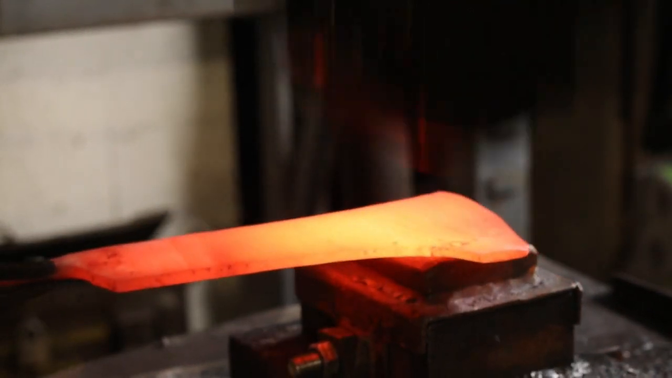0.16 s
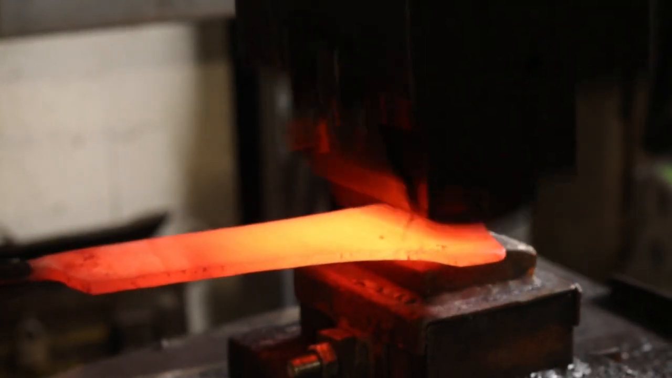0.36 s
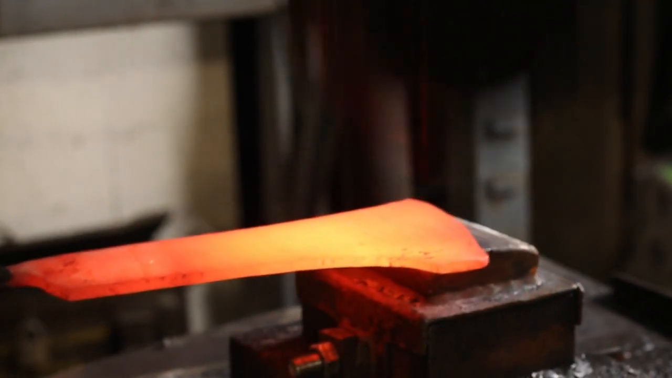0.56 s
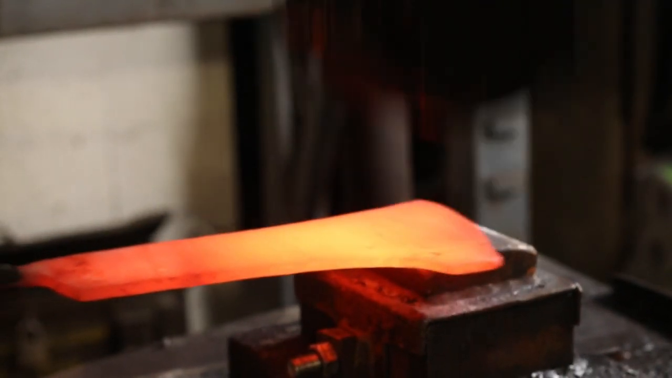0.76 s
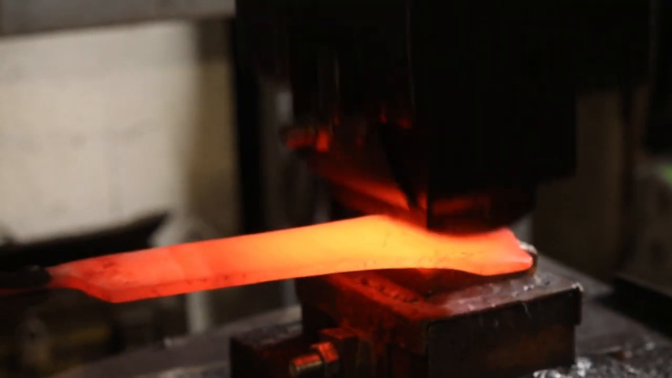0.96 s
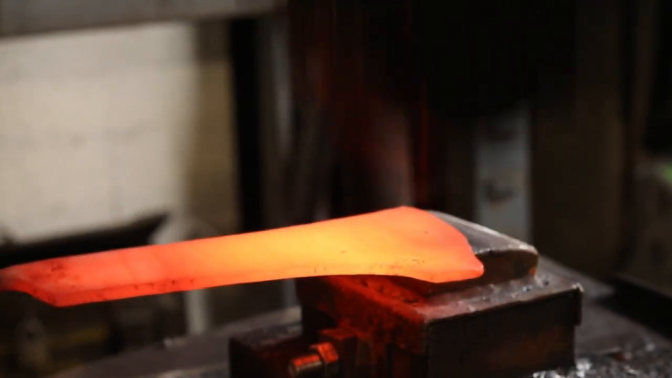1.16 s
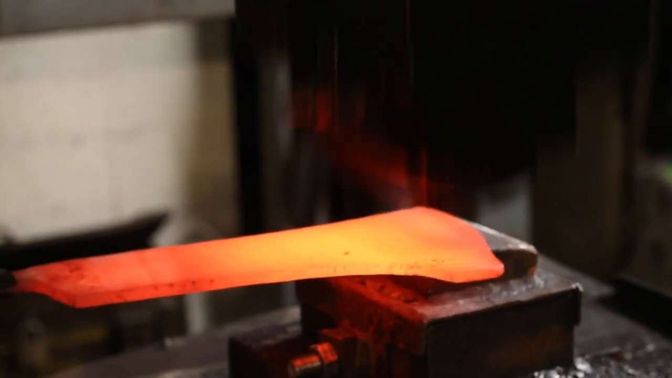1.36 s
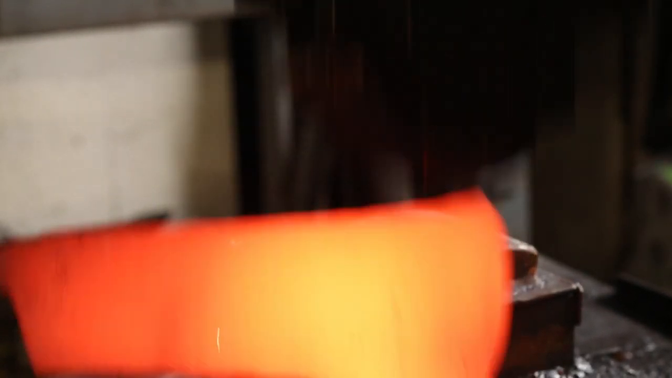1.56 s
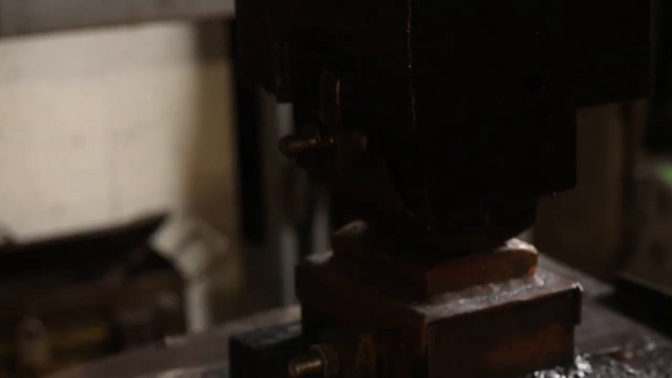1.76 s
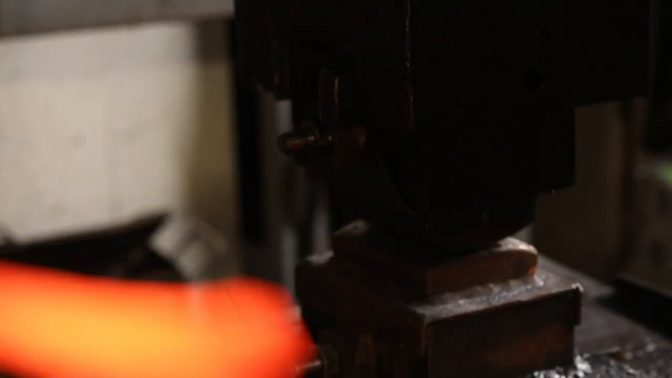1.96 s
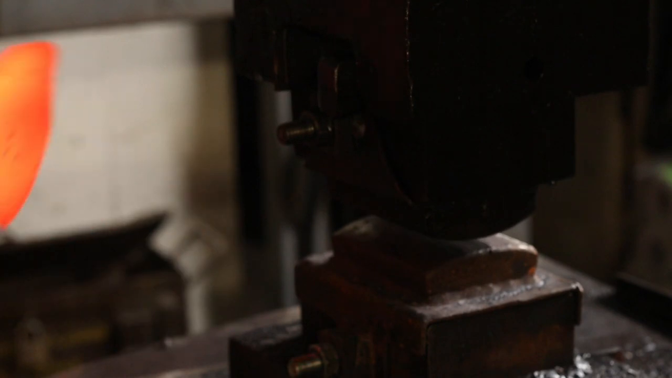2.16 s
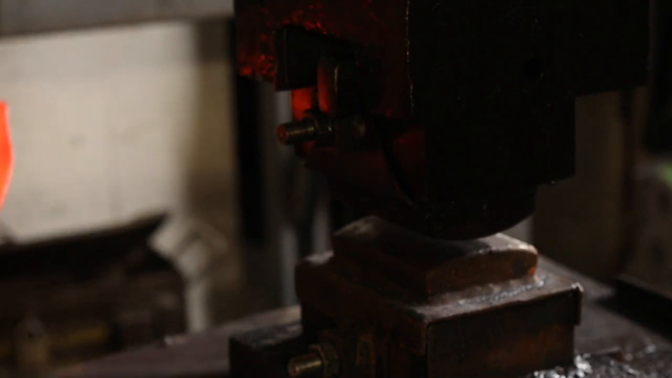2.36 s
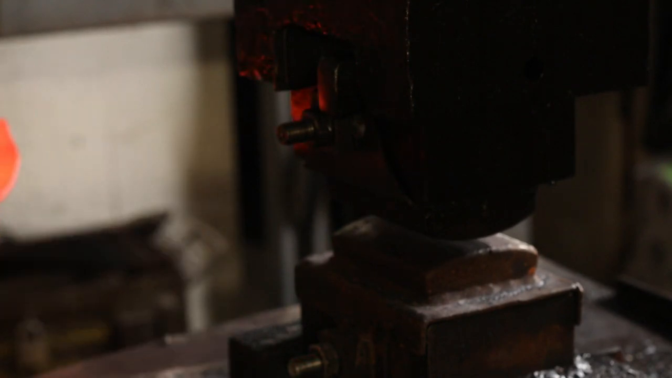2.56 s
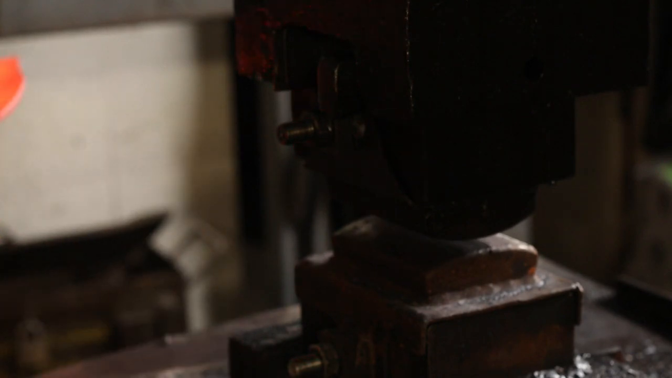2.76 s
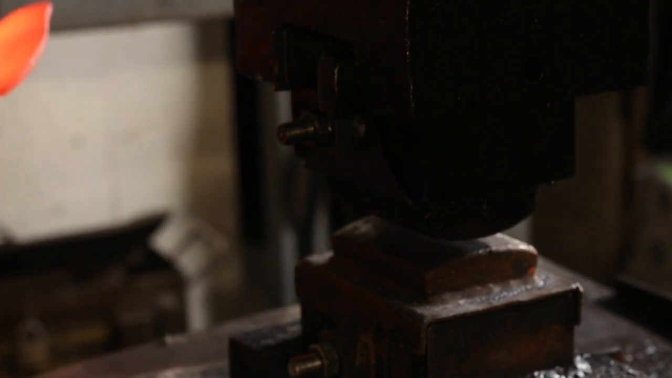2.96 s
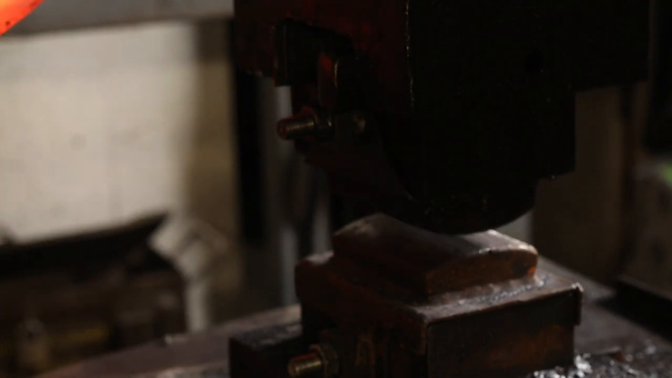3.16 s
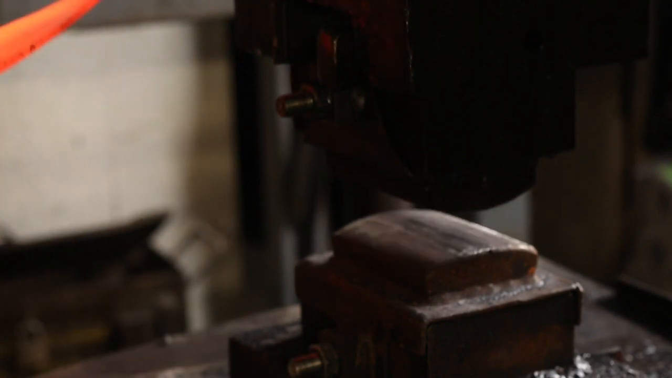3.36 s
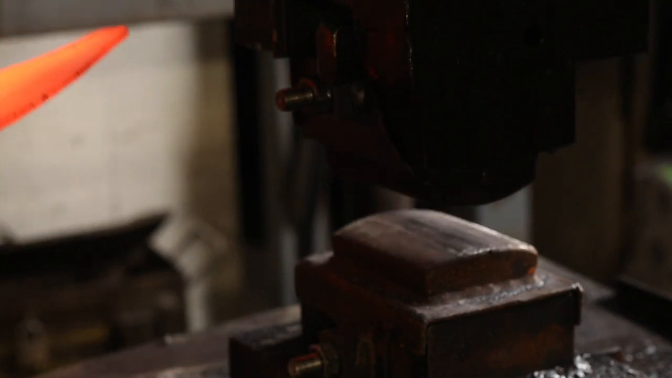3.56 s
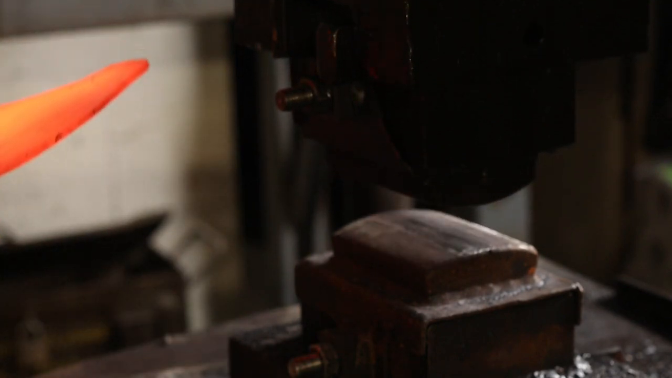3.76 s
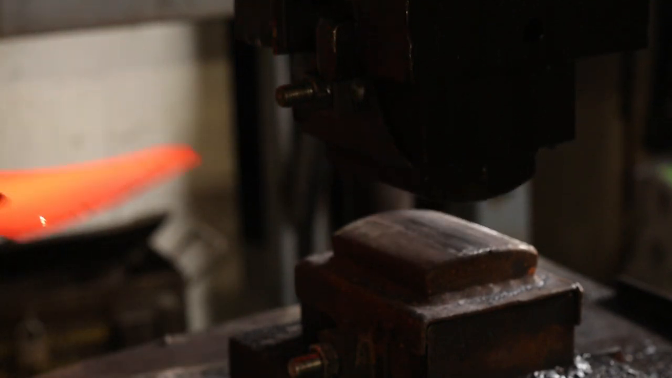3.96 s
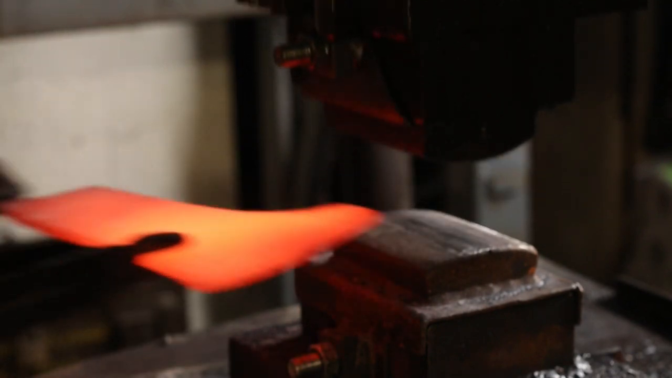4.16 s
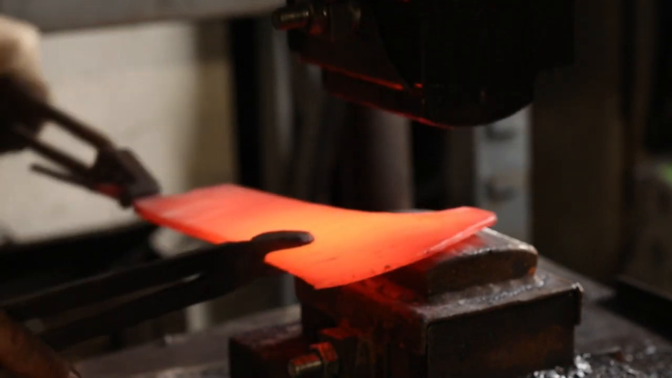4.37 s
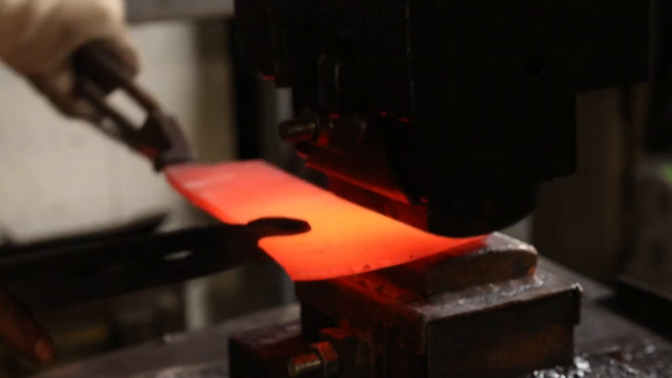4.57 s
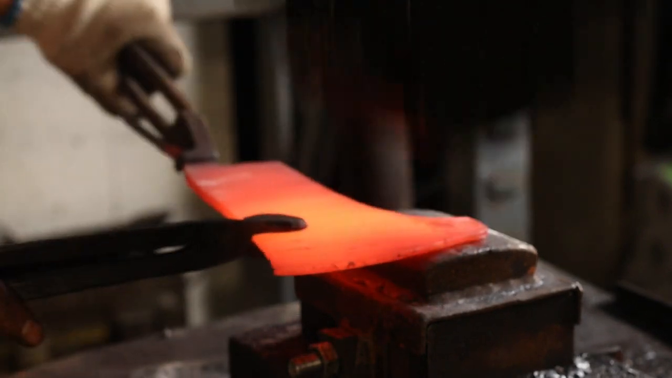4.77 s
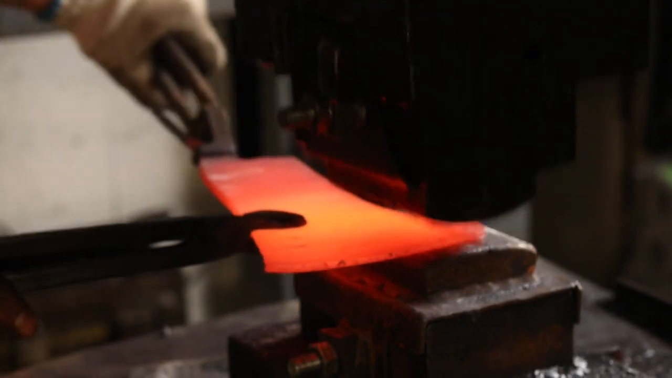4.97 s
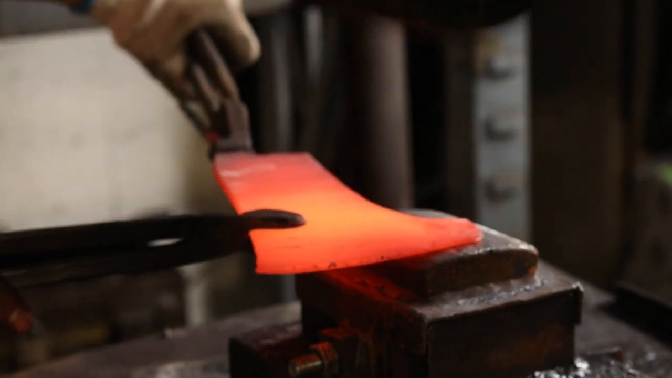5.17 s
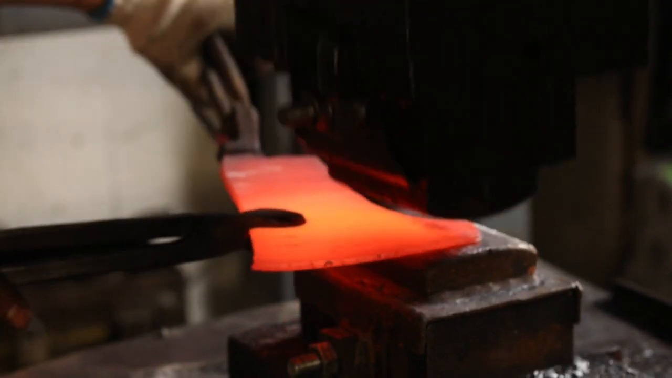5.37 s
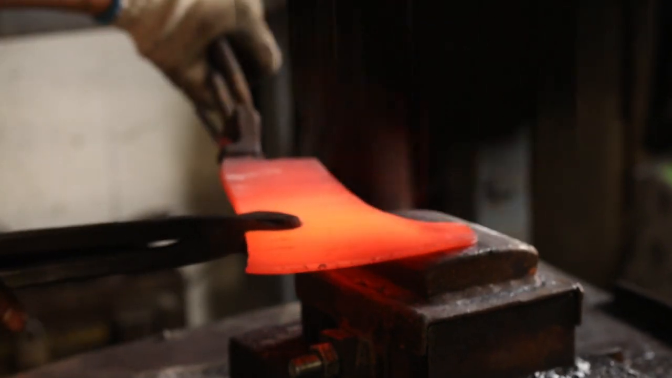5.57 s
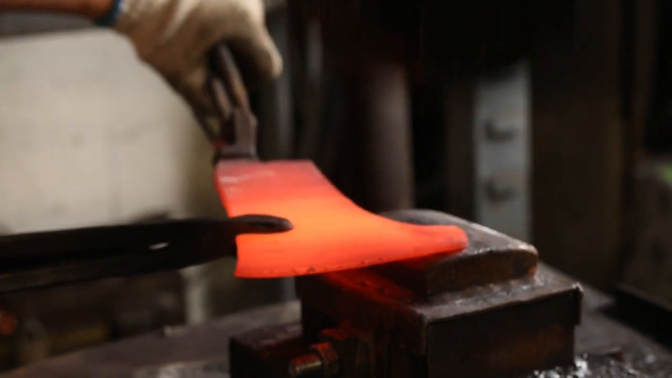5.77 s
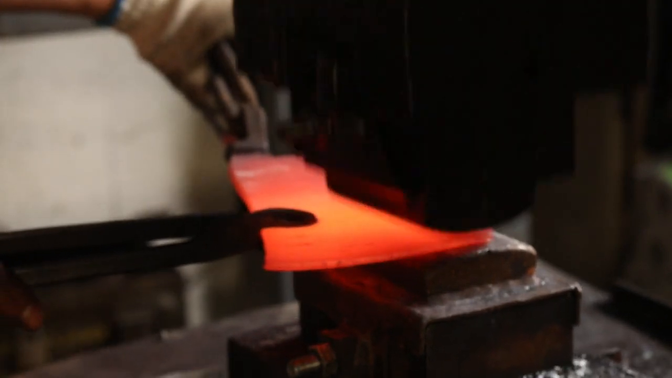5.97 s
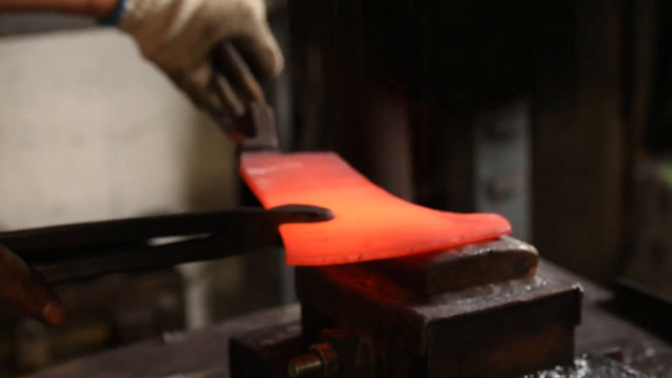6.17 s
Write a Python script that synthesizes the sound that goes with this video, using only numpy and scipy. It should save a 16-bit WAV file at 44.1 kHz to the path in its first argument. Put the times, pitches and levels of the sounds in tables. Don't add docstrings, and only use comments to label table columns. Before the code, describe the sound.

In a workshop, a mechanical power hammer strikes hot steel about every 0.3 seconds: five dull, heavy thuds, each with a rebound and a bright linkage clack, then a weak last blow. The drive rattles and drops away to a quiet, slowly rising motor hum with faint ticks and chinks of tongs. Five louder, crisper blows follow, ringing anvil and frame. Close stereo microphone, short metallic room tail.

```python
import sys
import numpy as np
from scipy import signal
from scipy.io import wavfile
from scipy.ndimage import uniform_filter1d

SR = 44100
rng = np.random.default_rng(int(sys.argv[2]) if len(sys.argv) > 2 else 0)


def unload_wav(signal):
    wavfile.write(
        sys.argv[1],
        SR,
        np.round(np.clip(np.atleast_2d(signal).T, -1, 1) * 32767).astype(np.int16),
    )


def amplitude_ratio(level_db):
    exponent = np.asarray(level_db, float) / 20
    return 10 ** exponent


N = 273861
T = np.arange(N) / SR
SECOND_RUN = (T > 3).astype(int)

# start_s, peak_db, crack_rel_db
STROKES = [
    [(0.1161, -2, -18.5), (0.406, -3, -12), (0.6988, -3.5, -18), (0.9966, -4, -10.5), (1.296, -6, -13),
     (1.7205, -14.5, -16)],
    [(4.6518, 1, -14.5), (5.037, -0.5, -0.5), (5.3672, 0.5, -1.5), (5.6935, 0, -5), (5.9913, 0, -12.5)],
]
# start_s, peak_db, crack_rel_db
REBOUNDS = [
    [(0.187, -14, -25.5), (0.478, -12.5, -19), (0.767, -13, -11), (1.072, -12, -10.5),
     (1.3603, -13.5, -7.5), (1.7903, -14.5, -11)],
    [(4.740, -8, -27), (5.1028, -9.5, 0), (5.441, -11, 3.5), (5.7594, -7.5, -9.5), (6.0676, -8, -8)],
]
# start_s, peak_db
KNOCKS = [
    [(1.423, -21), (1.761, -45), (1.826, -21)],
    [(4.539, -27), (4.681, -16), (4.794, -7), (4.822, -31), (5.158, -2.5), (5.518, -8)],
]
# shudder_s, shudder_lag_s, hall_db, anvil_force_rel_db
STANCE = [
    (0.048, -0.00032, -9.5, -20),
    (.034, -.001, -4.5, -17.5),
]
# thud_below_400hz_rel_db, sizzle_above_4khz_rel_db, shudder_share, hall_rel_db, softness
KINDS = [
    (-4, -8.5, 0.94, -1, 1.2),
    (-15, -8, 0.93, 0.5, 3.9),
    (-15, -14.5, 0.56, 1.5, 3),
]
REBOUND_FORCE_DB = [-13.5, -12]
CRACK_S = [0.0035, 0.0024]
DULLING_DB_PER_DB = 0.15
# pitch_hz, level_db, t60_s
FRAME_MODES = [(121, -8, .2), (177, 1, .22), (209, 0, .22), (235, -4, .15), (293, 0, .22), (380, -9, .12),
               (445, -3, .25), (512, -6, .16), (620, -10, .08), (767, -11, .1), (830, -11, .1),
               (1040, -12, .06), (1260, -14, .05)]
# freq_hz, level_db
BLOW_COLOUR = [(24, -46.5), (40, -47.5), (417, 3.5), (653, -5), (1220, -7), (1310, -9), (1640, -9),
               (2220, -12), (2710, -14.5), (3060, -17), (11500, -21.5), (13000, -19.5), (15500, -57)]

# start_s, peak_db, body_below_2khz_db, shudder_s
CLACKS = [(0.012, -10, -13.5, 0.016), (0.3022, -7.5, -19.5, 0.0093), (0.348, -27.5, -38, 0.0059),
          (0.596, -10.5, -33, 0.01), (0.6424, -35, -29, 0.01), (0.891, -9, -34, 0.011),
          (0.9437, -52, -32, 0.017), (1.186, -11, -46, 0.011), (1.2401, -31, -28, 0.019),
          (1.54, -10.5, -49, 0.0071), (1.616, -25, -47, 0.02), (1.6528, -18, -15, 0.0052),
          (1.977, -28, -38, 0.008), (4.9003, 7.5, -1, 0.01), (4.977, -8.5, -12, 0.0069),
          (5.029, -1.5, -14, 0.007), (5.207, -9, -6.5, 0.011), (5.241, 6.5, 1.5, 0.013),
          (5.324, -5, -8, 0.0072), (5.363, -5, -15.5, 0.005), (5.582, 1.5, -3.5, 0.016),
          (5.669, -9, -20, 0.011), (5.8806, 1.5, 0, 0.0089), (5.9275, -11.5, -16.5, 0.0099),
          (6.1918, -3.5, -44.5, 0.017)]
# freq_hz, level_db
CLACK_COLOUR = [(180, -19), (300, -15), (1000, -6), (3000, -8.5), (6000, -10.5), (12000, -19), (13800, -36),
                (15500, -57)]
# pitch_hz, level_db, t60_s
LINK_MODES = [(3400, 0, .05), (4900, -2, .03), (6500, -3, .04)]
CLACK_TOP_DB = -30.5

# start_s, effort_db
DRIVE = [(0, -28), (1.3, -34.5), (1.7, -35), (1.93, -35), (2.12, -57.5), (4.62, -72.5), (4.8, -34),
         (5.15, -23), (5.55, -24.5), (5.7, -29), (6.21, -33)]
CLATTER_SHARE_DB = [-2.5, 3]
# freq_hz, level_db
CLATTER_COLOUR = [(24, -40), (40, -31.5), (166, -0.5), (438, -12.5), (686, -2.5), (1600, -13.5),
                  (2510, -18), (3470, -15), (11500, -32), (13700, -41), (15500, -81)]

# start_s, peak_db, shudder_s, pan_db
TICKS = [
    (3.0794, -51.5, 0.028, -6.5),
    (3.272, -49, 0.0099, -18),
    (3.287, -43.5, 0.017, 6),
    (3.6242, -49.5, 0.0074, 15.5),
    (3.922, -43, 0.006, 9),
    (3.9952, -31, 0.0059, 3),
    (4.0247, -34.5, 0.0093, 0),
    (4.069, -37.5, 0.018, -11),
    (4.0836, -44, 0.0079, 7.5),
    (4.352, -20, 0.0043, -0.5),
]
# start_s, peak_db
CHINKS = [
    (2.437, -58),
    (2.489, -52),
    (2.849, -37),
    (2.872, -37),
    (4.573, -37.5),
]
# pitch_hz, level_db, t60_s
TONG_MODES = [(3435, -24, 0.59), (4151, -78, 5.0), (4737, -31, 5.0), (6150, -2, 0.11), (6476, -14, 0.32),
              (7144, -17, 0.22), (7515, -45, 0.68), (8070, -0.5, 0.098), (8823, -14, 0.16),
              (9432, -38, 0.72), (9840, -1.5, 0.15), (10780, -24, 0.75), (11800, -11, 0.21),
              (15300, -6, 0.096)]
TICK_TOP_DB = -9

# freq_hz, level_db
IDLE_COLOUR = [(15, -32), (30, -35), (64, -19.5), (110, -28), (180, -21), (280, -11), (460, -20),
               (670, -28), (1200, -27), (2500, -34), (4500, -40.5), (8000, -48.5), (12500, -51.5),
               (15500, -100)]
# freq_hz, width_hz, level_db
GEARS = [(302.4, 57, -8.5), (358.8, 12, -9.5), (485.4, 81, -7.5), (836, 45, -16), (2083, 180, -12.5),
         (4090, 160, -17.5)]
# pitch_hz, level_over_rumble_db
WHINE = [(312, -31.5), (439.3, -3), (137, -13), (768, -41), (1155, -36.5), (1430, -12.5)]
RUMBLE_SHARE_DB = [-11, -1.5]
# centre_s, level_db, width_s
SWELLS = [
    (2.04, -1, 0.036),
    (2.34, 2.5, .1),
    (2.52, -1, .06),
    (2.94, 1, .06),
    (3.47, -1, 0.066),
    (3.63, 2.5, 0.076),
    (3.79, -3.5, 0.08),
    (4.01, 3, 0.068),
    (4.45, 1, 0.13),
]
DRONE_DB = [-14, -9]
DRONE_KICK_DB = [-34, -27.5]
DRONE_HZ, DRONE_FADE_S = 121.1, 0.075
HUM_HZ, HUM_DB = 234.8, -39
BLOWER_HZ, BLOWER_DB, BLOWER_CREEP = 63.4, -56, 1.07
IDLE_DB = -52.5
QUIET_S, LOUD_S, CREEP_DB_PER_S = 2.375, 4.62, 7

# freq_hz, level_db
HISS_COLOUR = [(1000, -7), (5000, -1), (12300, -3), (13200, -40)]
HISS_DB = -77

# freq_hz, t60_s
HALL_DECAY = [(60, 0.3), (250, 0.41), (1000, 1), (3000, 1), (8000, 0.53), (15000, 0.3)]
# freq_hz, level_db
HALL_COLOUR = [(100, -2.5), (1000, 0.5), (4000, 2.5), (11500, 4.5), (14500, -14)]
# freq_hz, likeness
SAME_ROOM = [(60, 1), (180, 1), (550, 1), (1100, 0.44), (2500, -0.57), (5000, -0.49), (15000, -0.82)]
# freq_hz, likeness
SAME_RUN = [(60, 0.96), (180, 1), (550, 0.6), (1100, 0.36), (2500, 0.045), (5000, 0.18), (15000, 0.12)]
# freq_hz, likeness
SAME_IDLE = [(60, 1.0), (200, 0.99), (400, .88), (700, 0.68), (1300, .13), (2400, -0.48), (4400, -0.65),
             (15000, -1.4)]
# freq_hz, left_minus_right_db
LEAN_RUN = [(60, 0), (180, 2), (550, -3), (1650, -2.5), (4970, -1.3), (15000, -0.1)]
# freq_hz, left_minus_right_db
LEAN_IDLE = [(60, 0), (180, 2), (550, -1), (1650, -4), (4970, -3.5), (15000, -6)]
LEFT_LAG_SAMPLES, LAG_TOP_HZ = 4, 3300
DUCK_AFTER_S, DUCK_FROM_DB, DUCK_SHARE, RECOVER_DB_PER_S = 0.026, -19, 0.15, 49


def hammer():
    (s, db, low_db, high_db, length, wet_db, soft), (at, crack_db, force_db) = blows()
    steel = pair(BLOW_COLOUR, SAME_RUN, LEAN_RUN, patchy_db=1.2)
    parts = [  # noise, level_db, length share, rise_s
        (band(steel, 88, 400), low_db - 3, 1.2, 0.003),
        (band(steel, 290, 4750), -4, 1.01, 0.0006),
        (band(steel, 2800, 11050), high_db - 7.0, 0.85, 0.0004)]

    def shake(send_db):
        return sum(x * shudders(s, db + rel_db + send_db, length * share, rise_s * soft, 1.83)
                   for x, rel_db, share, rise_s in parts)

    ports = amplitude_ratio([[-1.1], [1.1]])
    hit = np.round(at * SR).astype(int)
    push = np.zeros(N)
    push[hit] = amplitude_ratio(force_db)
    push = signal.oaconvolve(push, np.hanning(round(0.00041 * SR)))[:N] * ports
    thump = signal.lfilter([1, -1], [1, -0.99], shudders(at, force_db + 9.5, 0.0023, 0.015)) * ports
    frame = amplitude_ratio(15.5) * ring(push, FRAME_MODES) + thump
    crack_s = np.take(CRACK_S, SECOND_RUN[hit])
    crack = band(steel, 910, 8600) * shudders(at, crack_db + 5.5, crack_s, 0.0001)
    return crack + frame + shake(0) + hall(shake(wet_db + 3.0) + amplitude_ratio(3.5) * frame)


def blows():
    shakes, dies = [], []
    for run, (length, lag, wet_db, force_db) in enumerate(STANCE):
        for kind, hits, late in zip(KINDS, (STROKES, REBOUNDS, KNOCKS), (lag, 0, 0)):
            low_db, high_db, share, more_db, soft = kind
            for s, db, *_ in hits[run]:
                sizzle_db = high_db + DULLING_DB_PER_DB * db
                shakes.append((s + late, db, low_db, sizzle_db, length * share, wet_db + more_db, soft))
        for hits, rel_db in ((STROKES, force_db), (REBOUNDS, REBOUND_FORCE_DB[run])):
            dies += [(s, db + crack_db, db + rel_db) for s, db, crack_db in hits[run]]
    return np.transpose(shakes), np.transpose(dies)


def linkage():
    s, db, body_db, length = np.transpose(CLACKS)
    steel = pair(CLACK_COLOUR, SAME_RUN, LEAN_RUN, patchy_db=1.5)
    dry = band(steel, 250, 2900) * shudders(s, body_db, length * 0.72, 0.0041, 0.65)
    dry += band(steel, 2030, 11000) * shudders(s, db - 12.5, length * 1.175, 0.17 * length, 1.8)
    dry += band(steel, 10000, 14000) * shudders(s, db + CLACK_TOP_DB + 15, length * 0.58, 0.27 * length, 2.4)
    dry += ring(band(steel, 2000, 10000) * shudders(s, db - 30, length, 0.002), LINK_MODES)
    return dry + amplitude_ratio(-14) * hall(dry)


def clatter():
    rattle = amplitude_ratio(2.2 * evened(uniform_filter1d(rng.standard_normal(N), size=500)))
    noise = pair(CLATTER_COLOUR, SAME_ROOM, LEAN_RUN, patchy_db=5.0)
    return noise * evened(rattle) * amplitude_ratio(curve(DRIVE) + np.take(CLATTER_SHARE_DB, SECOND_RUN))


def tongs():
    flat = [(20, 0), (20000, 0)]
    grit = pair(flat, SAME_RUN, flat, patchy_db=1)
    s, db, length, pan_db = np.transpose(TICKS)
    dry = np.zeros((2, N))
    for port, side in enumerate((0.5, -0.5)):
        port_db = db + side * pan_db
        dry[port] = band(grit[port], 2500, 7500) * shudders(s, port_db - 3.5, length, 0.0017)
        dry[port] += band(grit[port], 7400, 12000) * shudders(s, port_db + TICK_TOP_DB - 9.0, length, 0.00087)
    s, db = np.transpose(CHINKS)
    dry += ring(grit * shudders(s, db - 0.5, 0.0085, 0.0003), TONG_MODES)
    dry += band(grit, 5300, 15000) * shudders(s, db - 14, 0.032, 0.0004)
    return dry + amplitude_ratio(-5.0) * hall(dry)


def motor():
    creep_db = CREEP_DB_PER_S * np.clip(T - QUIET_S, 0, LOUD_S - QUIET_S)
    effort_db = curve(DRIVE)
    load = amplitude_ratio(IDLE_DB + creep_db) + amplitude_ratio(effort_db + np.take(RUMBLE_SHARE_DB, SECOND_RUN))
    return gear_rumble() * load + housing_hum(creep_db) + blower(creep_db) + drone(effort_db)


def gear_rumble():
    rumble = evened(pair(IDLE_COLOUR, SAME_IDLE, LEAN_IDLE, patchy_db=0.9)) * amplitude_ratio(2.5)
    white = pair([(20, 0), (20000, 0)], SAME_IDLE, LEAN_IDLE, patchy_db=1)
    rumble += sum(amplitude_ratio(db) * band(white, hz - width / 2, hz + width / 2) for hz, width, db in GEARS)
    return rumble + sum(tone(hz, db, waver=2.5) for hz, db in WHINE) * amplitude_ratio(-8)


def housing_hum(creep_db):
    swell_db = sum(db * np.exp(-((T - s) / width) ** 2) for s, db, width in SWELLS)
    gate = np.clip((T - 1.97) / 0.031, 0, 1) * np.clip((5.07 - T) / 0.04, 0, 1)
    return tone(HUM_HZ, HUM_DB + creep_db + swell_db, waver=0.63) * gate * amplitude_ratio([[0.3], [-0.3]])


def blower(creep_db):
    gate = np.clip((T - 1.95) / 0.1, 0, 1) * np.clip((5.05 - T) / 0.95, 0, 1)
    return tone(BLOWER_HZ, BLOWER_DB + BLOWER_CREEP * creep_db, waver=0.3) * gate


def drone(effort_db):
    s, db = blows()[0][:2]
    at, kicks = np.round(s * SR).astype(int), np.zeros(N)
    kicks[at] = amplitude_ratio(db + np.take(DRONE_KICK_DB, SECOND_RUN[at]))
    fading = signal.lfilter([1], [1, -np.exp(-1 / (DRONE_FADE_S * SR))], kicks)
    steady = amplitude_ratio(effort_db + np.take(DRONE_DB, SECOND_RUN))
    return tone(DRONE_HZ, 0, waver=3.24) * (uniform_filter1d(fading, size=600) + steady)


def hiss():
    return amplitude_ratio(HISS_DB) * pair(HISS_COLOUR, SAME_IDLE, LEAN_IDLE, patchy_db=0.5)


def hall(x):
    taps = np.zeros((2, SR))
    at = np.arange(300, SR - 20, 20) + rng.integers(0, 20, (2, (SR - 301) // 20))
    np.put_along_axis(taps, at, rng.choice([-1., 1.], at.shape), 1)
    hz, t, z = signal.stft(taps, SR, nperseg=512)
    like = np.clip(read(SAME_ROOM, hz), -1, 1)[:, None]
    z[1] = like * z[0] / left_lag(hz) + np.sqrt(1 - like ** 2) * z[1]
    decay_db = -60 * t / read(HALL_DECAY, hz)[:, None]
    lean_db = np.outer([0.5, -0.5], read(LEAN_RUN, hz))[..., None]
    z *= amplitude_ratio(decay_db + read(HALL_COLOUR, hz)[:, None] + lean_db)
    tail = signal.istft(z, SR, nperseg=512)[1]
    mono = x.mean(axis=0, keepdims=True)
    return signal.fftconvolve(mono, tail / np.linalg.norm(tail[0]), axes=1)[:, :N]


def ring(drive, modes):
    t = T[:SR // 3]
    apart = rng.uniform(-1, 1, len(modes))[:, None] * np.array([[0.25, -0.25]])
    body = 0
    for (hz, db, t60), turn in zip(modes, apart):
        phase = np.pi * min(hz / 900, 1) * turn[:, None]
        body = body + amplitude_ratio(db - 60 * t / t60) * np.sin(2 * np.pi * hz * t + phase)
    return signal.oaconvolve(drive, body / np.linalg.norm(body[0]), axes=1)[:, :N]


def shudders(starts, dbs, lengths, rise, hold=1):
    age = T[:SR // 5]
    out = np.zeros(N + SR)
    for s, db, length, up in np.broadcast(starts, dbs, lengths, rise):
        fall = np.exp(-(age / max(length, 0.001)) ** hold)
        out[round(s * SR):][:len(age)] += amplitude_ratio(db) * (1 - np.exp(-age / up)) ** 2 * fall
    return out[:N]


def tone(hz, db, waver):
    drift = evened(uniform_filter1d(rng.standard_normal(N), size=3000))
    phase = 2 * np.pi * np.cumsum(hz + waver * drift[::-1]) / SR
    return np.sqrt(2) * amplitude_ratio(db + waver * drift) * np.sin(phase)


def pair(colour, same, lean, patchy_db):
    hz = np.fft.rfftfreq(1024, 1 / SR)
    a, b, c, d, patches = rng.standard_normal((N // 256 + 5, 513, 5)).T
    patches = evened(uniform_filter1d(uniform_filter1d(patches, size=8, axis=0), size=6, axis=1))
    like = np.clip(read(same, hz), -1, 1)[:, None]
    left = a + 1j * b
    right = like * left + np.sqrt(1 - like ** 2) * (c + 1j * d)
    z = np.array([left * left_lag(hz), right])
    lean_db = np.outer([0.5, -0.5], read(lean, hz))[..., None]
    z *= amplitude_ratio(read(colour, hz)[:, None] + patchy_db * patches + lean_db)
    return evened(signal.istft(z, nperseg=1024, noverlap=768)[1][:, :N])


def left_lag(hz):
    lag_s = LEFT_LAG_SAMPLES / SR * np.exp(-(hz / LAG_TOP_HZ) ** 2)
    return np.exp(-2j * np.pi * hz * lag_s)[:, None]


def band(x, low_hz, high_hz):
    return evened(signal.sosfilt(signal.butter(2, [low_hz, high_hz], "band", fs=SR, output="sos"), x))


def evened(x):
    return x / np.sqrt(np.mean(x ** 2) + 1e-20)


def read(points, hz):
    f, value = np.transpose(points)
    return np.interp(np.log(hz + 1), np.log(f + 1), value)


def curve(rows):
    return np.interp(T, *np.transpose(rows))


def scene():
    return hammer() + linkage() + clatter() + tongs() + motor() + hiss()


def band_limit(x):
    return signal.sosfilt(signal.butter(12, 15730, fs=SR, output="sos"), x)


def record(dry):
    x = signal.sosfilt(signal.butter(3, 45, "high", fs=SR, output="sos"), dry)
    power_db = 10 * np.log10(abs(uniform_filter1d((x ** 2).mean(axis=0), size=440)) + 1e-12)
    fall_db = T * RECOVER_DB_PER_S
    held_db = np.maximum.accumulate(power_db + fall_db) - fall_db
    over_db = np.maximum(held_db - DUCK_FROM_DB, 0)
    late_db = np.interp(T - DUCK_AFTER_S, T, over_db)
    x = x / amplitude_ratio(DUCK_SHARE * uniform_filter1d(late_db, size=200))
    mix = np.clip(1.166 * np.tanh(x / 1.59), -1, 1)
    return band_limit(mix)


dry = scene()
out = record(dry)
unload_wav(out)
```